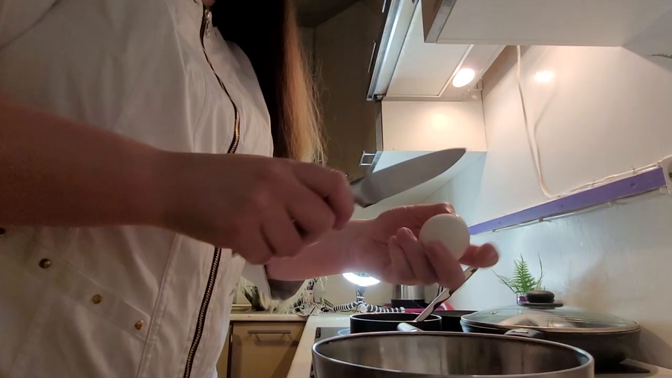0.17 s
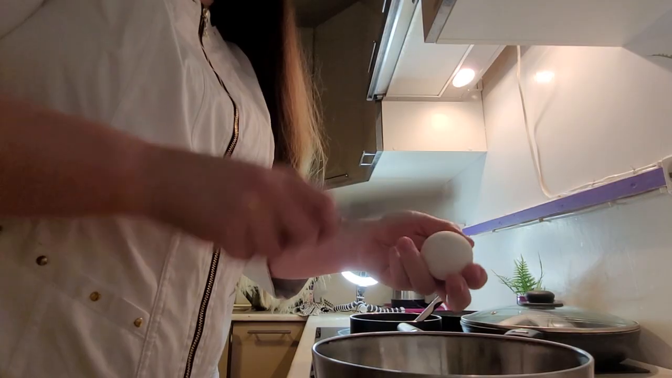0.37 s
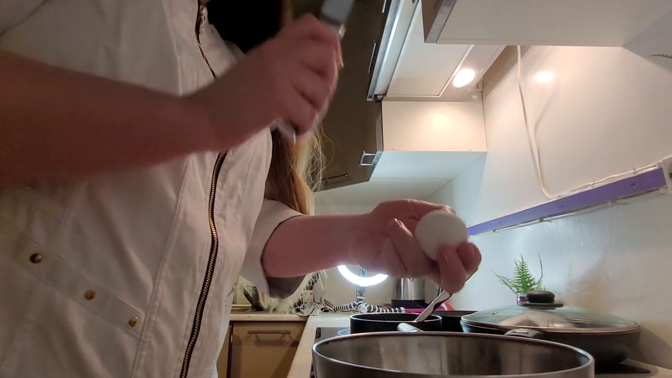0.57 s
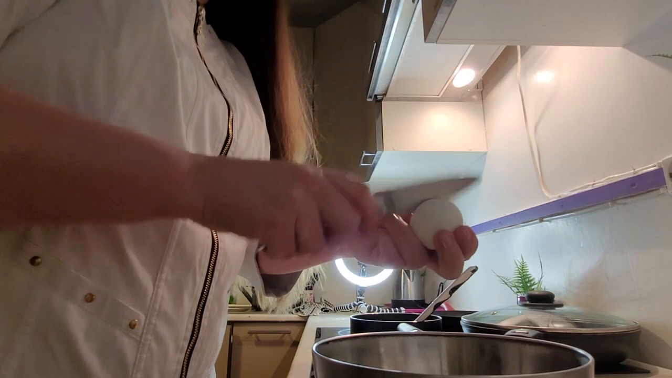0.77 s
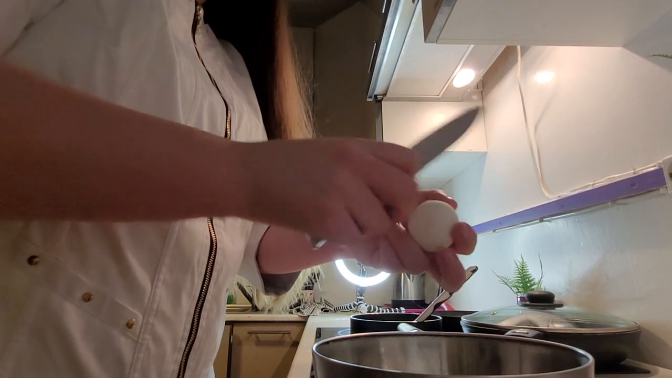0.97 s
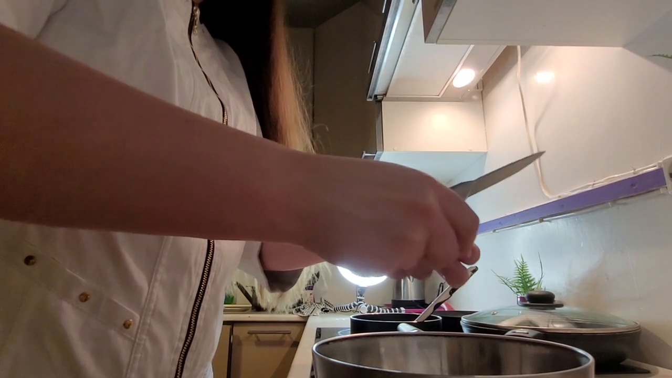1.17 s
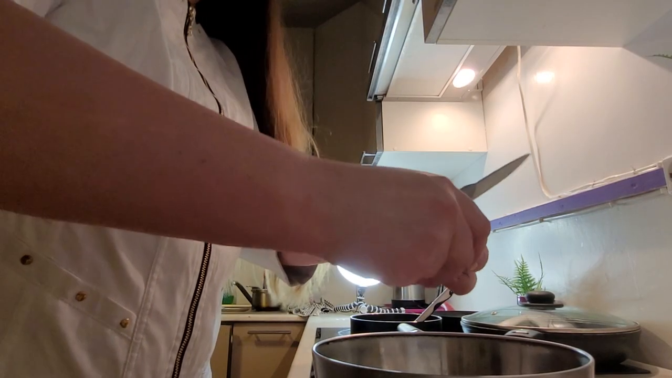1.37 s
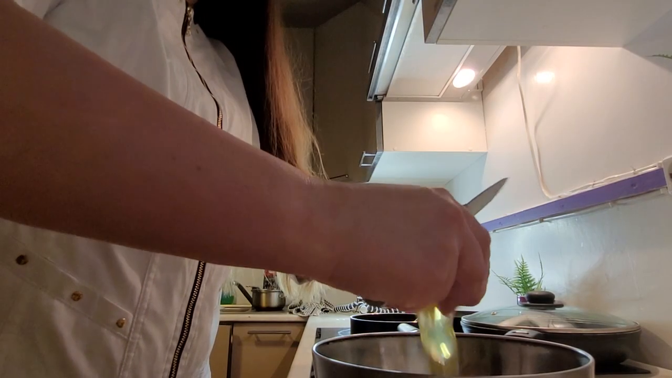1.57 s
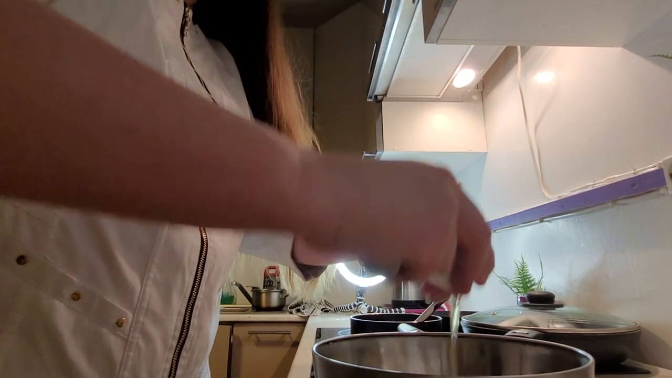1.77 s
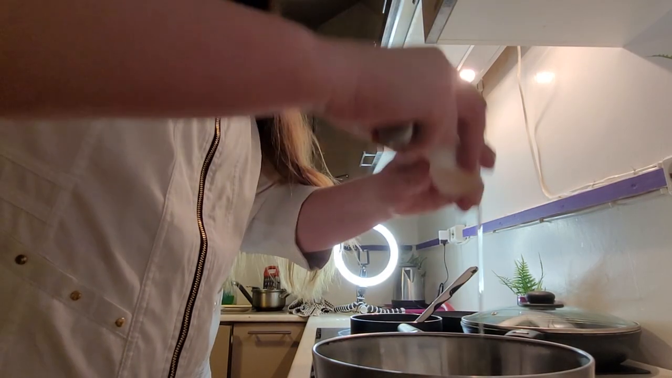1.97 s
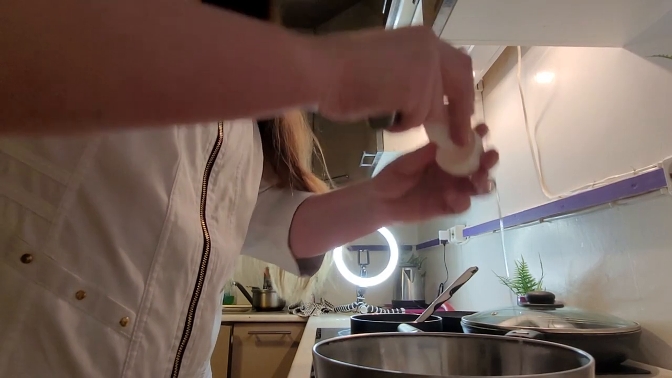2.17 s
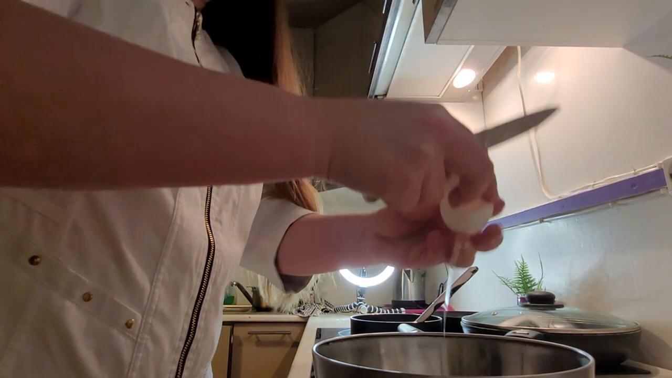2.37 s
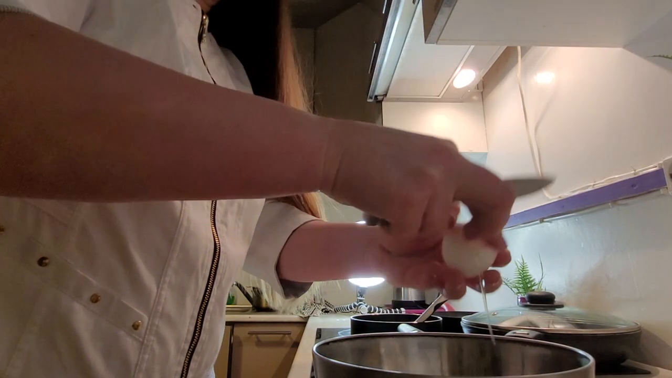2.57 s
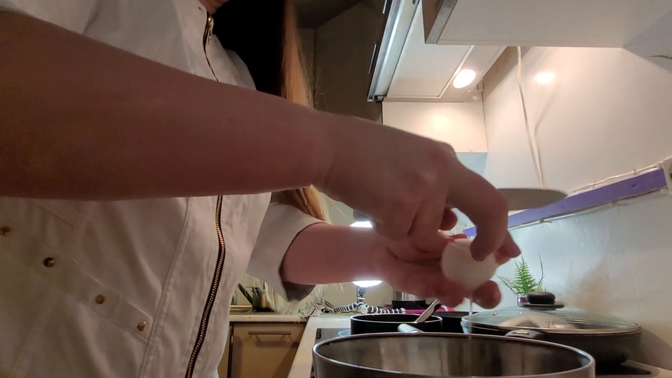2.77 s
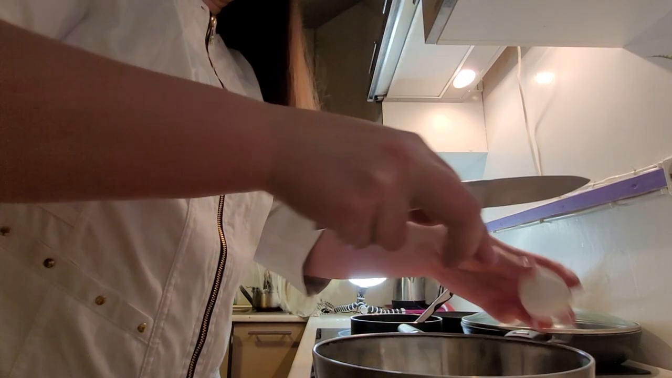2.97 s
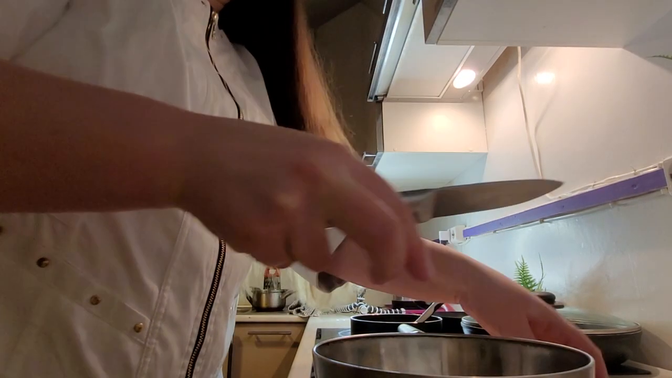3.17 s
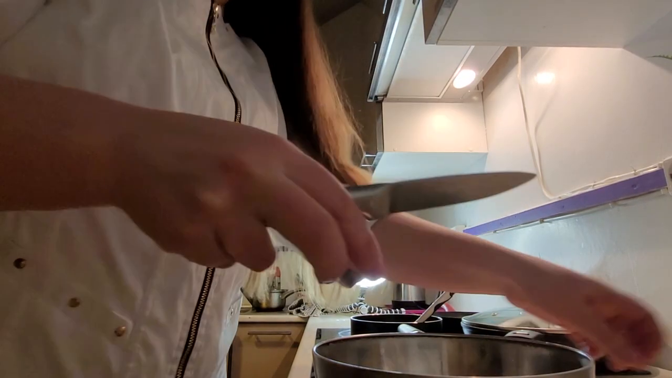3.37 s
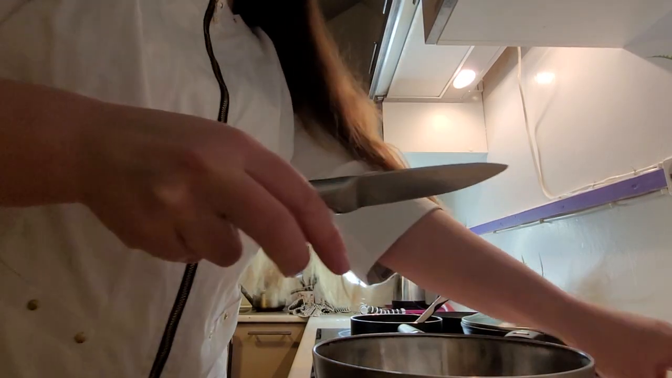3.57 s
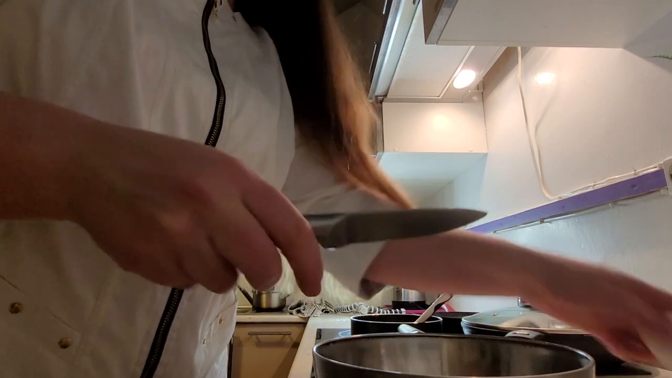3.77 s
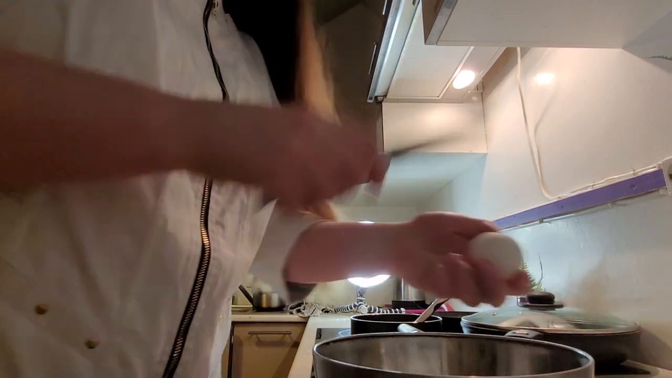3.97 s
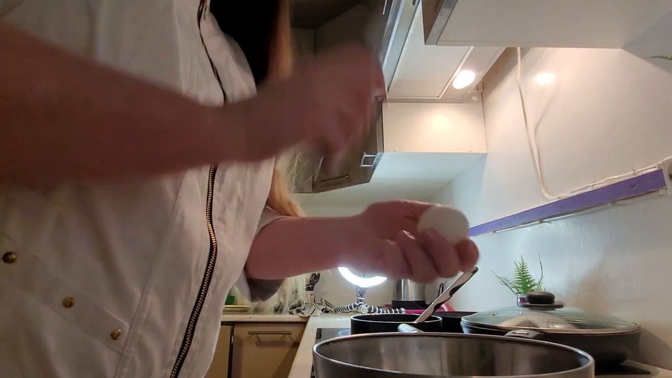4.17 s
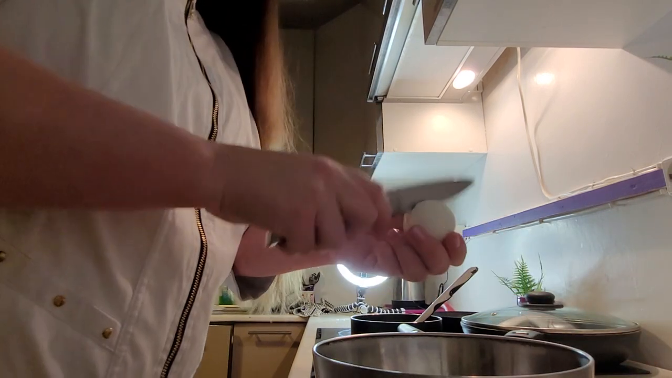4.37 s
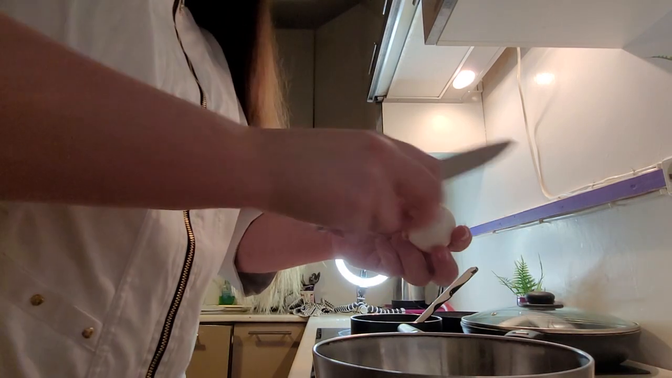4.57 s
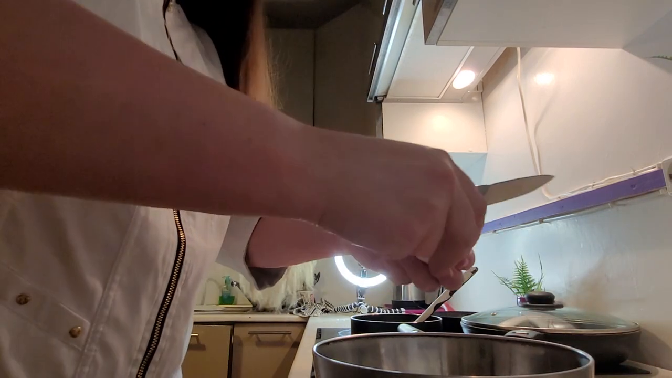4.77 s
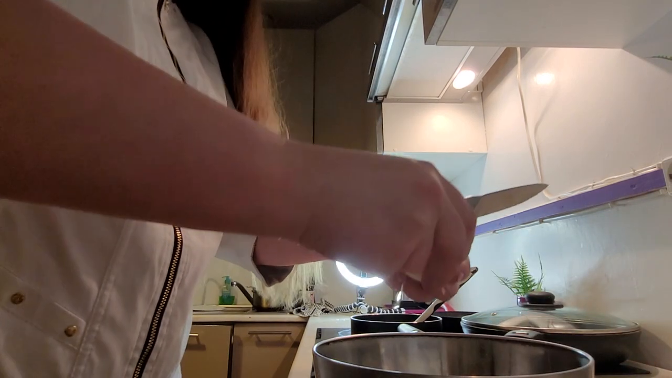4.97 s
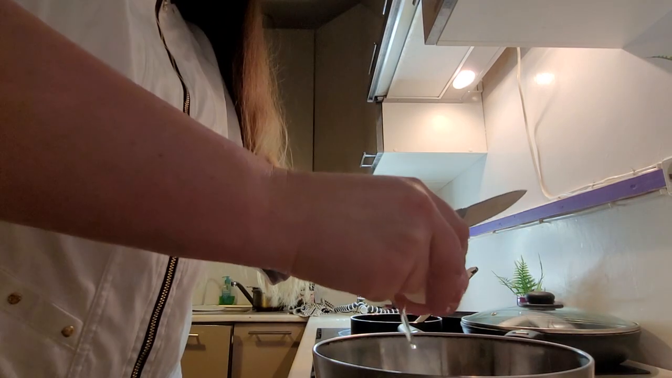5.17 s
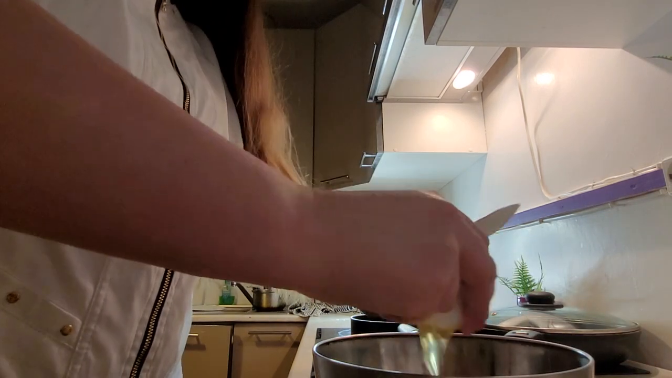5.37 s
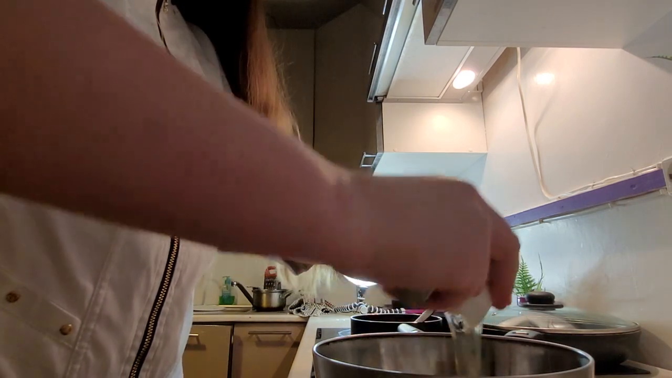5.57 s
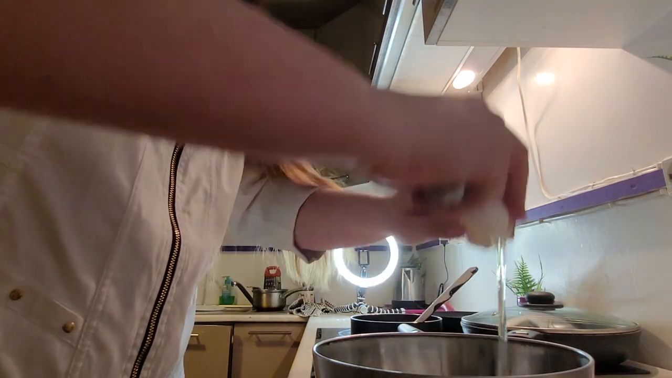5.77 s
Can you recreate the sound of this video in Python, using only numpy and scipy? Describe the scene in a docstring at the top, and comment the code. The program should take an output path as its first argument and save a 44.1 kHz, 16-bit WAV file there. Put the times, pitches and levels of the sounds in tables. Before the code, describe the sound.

Close stereo microphone, quiet home kitchen with low hum, hiss and faint sleeve rustle. A hard knife blow breaks an egg; small hollow crackles, a wet splat, and more shell ticks follow. A shell drops on the worktop, an egg is fetched with dull low bumps, then a second blow with brighter blade ring, a scrape and strong crunchy shell breaks.

```python
"""A small kitchen: two eggs are chopped with a knife and pulled open over a steel bowl, close to the
microphone. Shells are noise bursts of tiny breaks, ringing in the shell wall and in the egg's hollow; blade and
bowl are decaying modes. The first egg slaps into the bowl, its shell drops on the counter, the next egg rolls
as it is fetched. The chops overload the microphone; hum sines, filtered rumble, hiss, an early flickering noise
and sleeve noise lie behind."""
import sys
import numpy as np
from scipy import signal
from scipy.fft import rfft, irfft, next_fast_len
from scipy.io import wavfile
from scipy.ndimage import map_coordinates

SR = 44100
rng = np.random.default_rng(int(sys.argv[2]) if len(sys.argv) > 2 else 0)


def log_audio(samples):
    """Write samples as a 16-bit WAV file to the path given in sys.argv[1]."""
    # one column per channel
    frames = np.atleast_2d(samples).T
    # limit to full scale, then quantise
    limited = np.clip(frames, -1, 1)
    pcm = np.round(limited * 32767).astype(np.int16)
    wavfile.write(sys.argv[1], SR, pcm)


N = 256662
TIME_S = np.arange(N) / SR
AGE_S = np.arange(SR // 2) / SR  # time since the onset of a short sound

# mains hum and its neighbours: f/Hz, level/dB
HUM = [(100, -62), (167, -77.5), (200, -84.5), (290, -74.5)]
# low rumble, spectrum: f/Hz, density/dB per Hz
RUMBLE_SPECTRUM = [(22, -47.5), (38, -16.5), (54, 2.0), (75, -13.0), (130, -15), (400, -34.5), (2000, -86.5)]
# handling bumps at the worktop: t/s, level/dB
BUMPS = [(.21, -45), (.4, -58), (0.739, -45.5), (1.43, -50), (1.79, -38.5), (2.93, -51), (3.33, -39),
         (3.692, -34.5), (4.9, -46.5)]
# room hiss, spectrum: f/Hz, density/dB per Hz
HISS_SPECTRUM = [(30, 8.5), (60, 24.5), (150, 18.5), (260, 22.5), (420, 14.5), (560, 10.5), (750, 1.5),
                 (1100, 0), (2500, -5.5), (3800, -2.5), (5200, -3), (7500, 5), (10000, 3), (15500, 1)]
# early flickering noise, spectrum: f/Hz, density/dB per Hz
FLICKER_SPECTRUM = [(180, -32), (300, -6), (490, -6.5), (814, -6), (1190, -14.5), (1420, -11), (1970, -15.5),
                    (4050, -15.5), (12500, -24.5), (15000, -31.5)]
# early flickering noise, course: t/s, level/dB
FLICKER_LEVELS = [(0, -50.5), (.23, -50.5), (.26, -57), (.4, -73.5)]
# sleeve cloth, spectrum: f/Hz, density/dB per Hz
CLOTH_SPECTRUM = [(60, -6), (200, 7), (500, 8.5), (1000, -4.5), (1600, 1), (2600, -4), (7500, -5),
                  (10000, -9.5), (15500, -14)]
# arm movements brushing a sleeve: t at the fastest/s, level/dB, half length/s
STROKES = [(1.031, -56.5, .16), (1.502, -63.5, 0.51), (2.54, -57, 0.14), (3.154, -61, 0.17),
           (3.54, -53.5, 0.13), (3.935, -57.5, 0.12), (4.65, -60, 0.14), (5.65, -67.5, 0.22)]
# room decay: f/Hz, t60/s
ROOM_T60 = [(100, 0.63), (500, 0.32), (2000, 0.29), (4000, .29), (8000, .24), (15000, 0.077)]
# counter contacts: t/s, rise/s, decay/s, ring f/Hz, ring/dB, thud/dB, clack/dB, room/dB, left over right/dB
COUNTER = [(3.2661, 0.00043, 0.0018, 1583, -2.5, -19.5, -13.5, -10.5, -4.5),
           (3.280, 0.0032, 0.024, 1810, -35, -17.5, -18.5, -13, -2),
           (3.628, 0.0031, .012, 403, -33, -40.5, -46, -9.5, -7),
           (3.644, 0.011, 0.0063, 371, -25, -34, -42, -9, -6),
           (3.671, 0.0079, 0.0029, 378, -27, -37, -43.5, -25.5, -4)]
# counter thud, spectrum: f/Hz, density/dB per Hz
THUD_SPECTRUM = [(30, -25.5), (70, -20), (120, -2), (190, -1.5), (250, -10.5), (470, 3.5), (640, -1.5),
                 (780, -12), (980, 2.5), (1500, -13.5), (4000, -58)]
# counter clack, spectrum: f/Hz, density/dB per Hz
CLACK_SPECTRUM = [(300, -21.5), (1150, -1.5), (1550, 9), (2300, 7), (3200, -3), (4300, -11.5), (5200, -30),
                  (7200, -18), (10000, -24.5), (15500, -34)]
# raw egg landing: t/s, rise/s, decay/s, splat/dB, thud/dB, air pocket/dB
PLOPS = [(1.7646, 0.002, 0.0065, -34, -61, -55), (1.769, 0.00038, 0.016, -17.5, -33.5, -55),
         (1.808, 0.0027, 0.0038, -36, -37, -31.5)]
# bursting wet films, spectrum: f/Hz, density/dB per Hz
SPLAT_SPECTRUM = [(200, -3), (600, -20), (870, 1.5), (1050, -7.5), (1400, 1.5), (2200, -5), (4000, -14),
                  (5500, -13.5), (8000, 4.5), (10000, 0.5), (15500, 1.5)]
# soft landing thud, spectrum: f/Hz, density/dB per Hz
WET_THUD_SPECTRUM = [(30, -21), (60, -3.5), (100, 0), (200, -14.5), (450, -20.5), (1500, -58)]
# modes of the air pocket under the egg: f/Hz, level/dB, t60/s
POCKET_MODES = [(1430, -11, 0.13), (1530, -17, .12)]
# hollow of each egg, high while the split is narrow, lower as it opens and empties: t/s, f/Hz, Q/1
FIRST_HOLLOW = [(1.21, 2100, 4.3), (1.35, 3600, 1.55), (1.48, 3120, 15), (1.57, 2085, 10.4),
                (1.97, 1970, 3), (2.092, 2920, 0.54), (2.391, 1865, 4.9), (2.559, 1830, 9.1),
                (2.68, 1393, 12), (3.17, 1460, 7.9)]
SECOND_HOLLOW = [(4.45, 2200, 2.3), (4.74, 5600, 11), (4.9, 6000, 3.9), (5.11, 3086, 5.2), (5.16, 1945, 10),
                 (5.28, 1900, 2.5), (5.36, 2376, 0.85), (5.42, 1800, 1.9), (5.57, 1720, 6.4)]
# sudden shell breaks: t/s, level/dB, decay/s, dry snap over hollow ring/dB
CRACKS = [(0.827, -33, 0.002, 30), (1.213, -56, 0.0095, -8), (1.356, -42, .005, 8),
          (1.462, -20.5, 0.0029, 1), (1.48, -32, 0.0045, -1), (1.607, -35, .005, -7),
          (1.642, -50.5, 0.0039, 10), (1.893, -51, 0.0062, 8), (1.965, -47, 0.0071, -1.5),
          (2.022, -41.5, 0.00093, 1), (2.408, -31.5, 0.013, -7.5), (2.553, -36, 0.01, -5.5),
          (2.624, -43.5, 0.0074, -4.5), (2.66, -41, 0.013, -9), (2.683, -36.5, 0.0037, -9.5),
          (2.75, -48, .0047, -10.5), (3.1559, -36, 0.0014, -23), (3.1918, -42, 0.00046, -27),
          (4.547, -50, 0.0042, 19), (4.747, -45, 0.0067, -22.5), (4.895, -57.5, 0.0061, 2.5),
          (5.116, -47.5, 0.0054, 1.5), (5.152, -45.5, 0.0088, 3.5), (5.272, -28.5, 0.012, 2),
          (5.296, -24, 0.0089, 2.5), (5.3085, -11, 0.0099, -2), (5.419, -26.5, 0.0068, -13),
          (5.524, -22, 0.0049, 13), (5.57, -19.5, 0.0065, -3)]
# slow swelling sounds (shell and membrane tearing, white draining through the hollow, blade scraping out):
# t/s, level/dB, swelling time/s, dry snap over hollow ring/dB
SWELLINGS = [(1.555, -33, 0.0081, -24), (1.584, -35.5, 0.0072, -22), (2.058, -34.5, 0.038, -6),
             (2.378, -39, 0.027, 1), (2.459, -43.5, 0.055, -9), (2.78, -64, 0.11, -10),
             (3.02, -47.5, .1, -10.5), (4.385, -27, 0.036, 6.5), (5.075, -59, 0.057, -5),
             (5.347, -14, 0.0072, 0), (5.378, -26, .0047, -40), (5.548, -20.5, 0.014, -12.5)]
# dull knocks and rubs on the egg (blade knocking off the shell at 0.822 s, then fingers shifting their grip):
# t/s, level/dB, swelling time/s, f/Hz
DULL_RUBS = [(0.822, -35.5, 0.0027, 517), (1.376, -49.5, 0.0071, 654), (1.435, -42.5, 0.047, 637),
             (1.555, -44, 0.042, 700), (2.682, -39, 0.0012, 500), (4.58, -45.5, 0.0935, 432.6),
             (5.11, -53, 0.046, 670)]
# dry shell snap, spectrum: f/Hz, density/dB per Hz
SNAP_SPECTRUM = [(200, -39), (900, -25), (2000, -10.5), (4000, 8), (5600, 2), (7300, 6), (9500, -6.5),
                 (12000, -1), (15500, -7)]
# dull knock on the fingers, spectrum: f/Hz, density/dB per Hz
KNOCK_SPECTRUM = [(60, -19.5), (250, -20.5), (480, -5.5), (670, 0), (850, -27), (1200, -18), (4000, -29.5)]
# knife blows: t/s, level/dB, crushing time/s, decay/s, bowl ring/dB, room/dB
CHOPS = [(0.7275, -0.5, 0.0043, 0.0042, -26.5, -6.5), (4.285, -0.5, 0.0052, 0.00726, -28, -5.5)]
# spectrum of each blow on its egg, one list per blow: f/Hz, density/dB per Hz
CHOP_SPECTRA = [
    [(47, -52.5), (80, -24), (190, -18.5), (391, -6.5), (477, -10), (621, -0.5), (741, -9.5), (1150, -12),
     (1570, -8.5), (1870, -10), (2600, -6), (2970, -10), (3780, -1.5), (5620, -10.5), (6860, -7.5),
     (15500, -12.5)],
    [(47, -54.5), (80, -26), (220, -21.5), (400, -2.5), (741, -7), (864, -5.5), (1010, -10), (1080, -4),
     (1950, -16.5), (2180, -4.5), (3240, -14), (3700, -5), (7170, -6.5), (8740, -11), (15500, -9.5)],
]
# blade set ringing, as it strikes or springs free of the shell: t/s, ring/dB, rub/dB
TWANGS = [(.728, -32, -30), (4.2875, -22, -30), (4.4515, -33, -30)]
# steel modes of blade and bowl: f/Hz, level/dB, t60/s
BLADE_MODES = [(1599, -18, .33), (2234, 1, .2), (3900, -12, .37), (5900, -7, .17), (6379, -14, .14),
               (7887, -10, .15), (8511, -13, .12), (11550, -9, .09), (12300, -10, .12)]
BOWL_MODES = [(392, -10.5, .25), (620, -3.5, 0.3), (855, -8, 0.31), (1280, -10, .22), (1520, -3, 0.15),
              (1785, -9, 0.24), (2611, -5.5, .26), (2799, -8.5, .25), (3680, -4, 0.25), (3900, 4, 0.18),
              (4274, -5.5, .27), (4470, -3, .25), (4780, -7.5, .25), (6616, -0.5, .22), (7047, -2.5, 0.2),
              (7106, -4.5, 0.18), (8023, -10.5, .25)]

RUMBLE_DB, RUMBLE_SWING_DB, BUMP_HALF_S = -59.5, -1, 0.018
CLOTH_REST_DB = -72  # clothes between the movements
CRACK_RISE_SHARE, SWELLING_DECAY_S = 0.14, 0.013  # a crack's rise over its decay; a swelling's decay
WALL_HZ, WALL_Q, WALL_DB = 3443, 12, -5.5  # the shell wall's own ring, against the hollow
WALL_DB_PER_OCTAVE = -9.5  # between hollow and wall: the closer, the better they couple
KNOCK_DB, KNOCK_DB_PER_DB = -22.5, 0.85  # knock of a 0 dB break; its growth with the break
HAND_Q, RUB_DECAY_S = 3.2, 0.0036  # cupped hand around the egg; decay of a dull rub
BAND_LIMIT_HZ = 15800


def amp(db):
    """Decibels to gain."""
    return 10 ** (np.asarray(db) / 20)


def unit(x):
    """Scale to rms 1."""
    return x / np.sqrt(np.mean(x ** 2) + 1e-20)


def dose(x):
    """Scale each port of a short sound to the energy of 10 ms at rms 1."""
    energy = np.sum(x ** 2, axis=-1, keepdims=True)
    return x / np.sqrt(energy / (SR / 100) + 1e-20)


def along(points, hz):
    """Read (f/Hz, value) points on a log frequency axis."""
    f, value = np.transpose(points)
    return np.interp(np.log(hz + 1), np.log(f), value)


def swell(rows):
    """Gain per sample from (t/s, level/dB) rows."""
    return amp(np.interp(TIME_S, *np.transpose(rows)))


def bell(s, half_s):
    """Smooth rise and fall around time s."""
    return np.exp(-((TIME_S - s) / half_s) ** 2)


def wobble(rate_hz):
    """Smooth random curve, rate_hz knots a second."""
    knots = rng.standard_normal(int(N * rate_hz / SR) + 4)
    return map_coordinates(knots, [TIME_S * rate_hz])


def filtered(x, response):
    """Apply a complex frequency response, with zero padding."""
    n = x.shape[-1]
    m = 2 * next_fast_len(n // 2 + 4096)
    return irfft(rfft(x, m) * response(np.fft.rfftfreq(m, 1 / SR)), m)[..., :n]


def coloured(x, spectrum):
    """Minimum-phase filter of the given shape, by folding the cepstrum."""
    def response(hz):
        cepstrum = irfft(np.log(amp(along(spectrum, hz))))
        half = len(cepstrum) // 2
        cepstrum[1:half] *= 2
        cepstrum[half + 1:] = 0
        return np.exp(rfft(cepstrum))
    return filtered(x, response)


def resonance(hz, centre_hz, q):
    """Response of one damped resonance, 1 at its centre."""
    damping = 1j * hz * centre_hz / q
    return damping / (centre_hz ** 2 - hz ** 2 + damping)


def resonated(x, first, second):
    """Two resonances in series, each (f/Hz, Q)."""
    return filtered(x, lambda hz: resonance(hz, *first) * resonance(hz, *second))


def add(track, s, x):
    """Mix x into track from time s."""
    i = round(s * SR)
    track[:, i:i + x.shape[-1]] += x[..., :N - i]


def rush(spectrum, apart):
    """Steady stereo noise of rms 1; apart weighs each port's own noise against the shared one."""
    noise = rng.standard_normal(N) + apart * rng.standard_normal((2, N))
    return unit(coloured(noise, spectrum))


def fractures(rise_s, decay_s, hold_s=0, spiky_db=5, apart=1.0):
    """A run of tiny breaks of very unequal size; each port hears them a little differently."""
    n = len(AGE_S)
    fade = np.exp(-np.maximum(AGE_S - rise_s - hold_s, 0) / decay_s)
    shape = np.minimum(AGE_S / rise_s, 1) * fade
    sizes = amp(spiky_db * np.clip(rng.standard_normal(n), -2, 2))
    sizes = sizes[np.arange(n) // (SR // 2000)]  # a new size every half millisecond
    return shape * sizes * (rng.standard_normal(n) + apart * rng.standard_normal((2, n)))


def ring(modes):
    """Decaying modes, each at its own strength and phase in either port."""
    hz, db, t60_s = np.transpose(modes)[:, :, None]
    tilt_db = np.array([1, -1])[:, None, None] * rng.normal(0, 1.2, hz.shape)
    size = amp(db + tilt_db)
    phase = rng.uniform(0, 2 * np.pi, hz.shape) + rng.normal(0, 0.17, size.shape)
    fade = np.exp(-np.log(1000) * AGE_S / t60_s) * (1 - np.exp(-AGE_S / 0.0013))
    return np.sum(size * fade * np.sin(2 * np.pi * hz * AGE_S + phase), axis=1)


def kitchen(x, wet_db, near_db=-7):
    """Bowl, hands and counter answer within milliseconds, then the tiled walls."""
    hz, t, z = signal.stft(rng.standard_normal((2, len(AGE_S))), SR, nperseg=256)
    fade = np.exp(-np.log(1000) * t / along(ROOM_T60, hz)[:, None])
    tail = signal.istft(z * fade, SR, nperseg=256)[1][:, :len(AGE_S)]
    tail *= 1 - np.exp(-(AGE_S / 0.002) ** 2)
    near = rng.standard_normal(tail.shape) * np.exp(-AGE_S / 0.0038)
    near *= rng.random(tail.shape) < 0.1  # sparse reflections
    answer = 0
    for h, db in [(tail, wet_db), (near, near_db)]:
        answer = answer + amp(db) * h / np.linalg.norm(h, axis=1, keepdims=True)
    return x + signal.fftconvolve(x, answer, axes=1)[:, :x.shape[-1]]


def placed(x, left_db, lag_s, mono_hz=450):
    """Long waves reach both ports more alike; the left is louder by left_db and later by lag_s."""
    side = filtered((x[0] - x[1]) / 2, lambda hz: (hz + 0.28 * mono_hz) / (hz + mono_hz))
    pair = x.mean(axis=0) + np.array([side, -side])
    lags_s = np.array([[lag_s], [-lag_s]])  # half of it to each port
    shifted = filtered(pair, lambda hz: np.exp(-1j * np.pi * hz * lags_s))
    return amp([[left_db / 2], [-left_db / 2]]) * shifted


def mains_hum():
    """Steady sines, wandering a little in level and phase."""
    hum = 0
    for hz, db in HUM:
        gain = amp(db + wobble(2.9)) * np.sqrt(2)  # rms to peak
        hum = hum + gain * np.sin(2 * np.pi * hz * TIME_S + 0.2 * wobble(1))
    return hum


def rumble():
    """Low noise that wanders, and swells at each bump."""
    gain = amp(RUMBLE_DB + RUMBLE_SWING_DB * wobble(4.2))
    gain = gain + sum(amp(db) * bell(s, BUMP_HALF_S) for s, db in BUMPS)
    return gain * rush(RUMBLE_SPECTRUM, apart=0.27)


def early_flicker():
    """Flickering noise, strong in the first quarter second, then dropping to a faint level."""
    return swell(FLICKER_LEVELS) * amp(1.3 * wobble(120)) * rush(FLICKER_SPECTRUM, apart=1.6)


def sleeves():
    """Cloth rustles with the speed of the arm, which rises and falls in each movement."""
    gain = amp(CLOTH_REST_DB) + sum(amp(db) * bell(s, half_s) for s, db, half_s in STROKES)
    return gain * amp(0.43 * wobble(19)) * rush(CLOTH_SPECTRUM, apart=6.3)


def background():
    """Hum and rumble, then hiss, early flicker and sleeves with a smaller lag."""
    low = mains_hum() + rumble()
    hiss = amp(-65.5) * rush(HISS_SPECTRUM, apart=2.4)
    high = hiss + early_flicker() + sleeves()
    return placed(low, left_db=-1.0, lag_s=0.0002) + placed(high, left_db=-1.0, lag_s=0.00005)


def counter():
    """An empty shell drops with a hollow pock and settles; a full egg wobbles along, much lower."""
    out = np.zeros((2, N))
    for s, rise_s, decay_s, ring_hz, ring_db, thud_db, clack_db, wet_db, left_db in COUNTER:
        contact = fractures(rise_s, decay_s, spiky_db=1.0, apart=0.29)
        pock = dose(resonated(contact, (ring_hz, 5), (ring_hz, 1.2)))
        thud = dose(coloured(fractures(rise_s, decay_s + 0.01, apart=0.48), THUD_SPECTRUM))
        clack = dose(coloured(contact, CLACK_SPECTRUM))
        knock = amp(ring_db) * pock + amp(thud_db) * thud + amp(clack_db) * clack
        add(out, s, placed(kitchen(knock, wet_db), left_db, lag_s=0.00027))
    return out


def plops():
    """The egg slaps onto steel: a spray of bursting films, a soft thud and the pop of trapped air."""
    out = np.zeros((2, N))
    for s, rise_s, decay_s, splat_db, thud_db, pocket_db in PLOPS:
        slap = fractures(rise_s, decay_s, spiky_db=-4.0, apart=1.46)
        splat = amp(splat_db) * dose(coloured(slap, SPLAT_SPECTRUM))
        thud = amp(thud_db) * dose(coloured(fractures(rise_s, decay_s, apart=0.42), WET_THUD_SPECTRUM))
        pop = amp(pocket_db) * dose(resonated(slap, (1460, 44), (1900, 1.9)))
        landing = kitchen(splat + thud, wet_db=-11.0) + kitchen(pop, wet_db=-8.5)
        landing = landing + amp(pocket_db) * ring(POCKET_MODES)
        add(out, s, placed(landing, left_db=-2, lag_s=0.00009))
    return out


def dull_rub(db, rise_s, pitch_hz):
    """A knock or rub on the shell sounds dully in the cupped hand."""
    rub = fractures(rise_s, RUB_DECAY_S, apart=0.74)
    return amp(db) * dose(resonated(rub, (pitch_hz, HAND_Q), (pitch_hz, 2.5)))


def shell_burst(s, db, rise_s, decay_s, snap_db):
    """A grainy burst snaps, rings the shell wall and the hollow as it is just then, and knocks dully."""
    times_s, pitches_hz, qs = np.transpose(FIRST_HOLLOW + SECOND_HOLLOW)
    hollow_hz, q = np.interp(s, times_s, pitches_hz), np.interp(s, times_s, qs)
    grains = fractures(rise_s, decay_s, spiky_db=7.5, apart=0.97)
    hollow = dose(resonated(grains, (hollow_hz, q), (hollow_hz, 1.0)))
    wall = dose(resonated(grains, (WALL_HZ, WALL_Q), (WALL_HZ, 3.8)))
    wall_db = WALL_DB + WALL_DB_PER_OCTAVE * abs(np.log2(hollow_hz / WALL_HZ))
    snap = dose(coloured(grains, SNAP_SPECTRUM))
    burst = hollow + amp(wall_db) * wall + amp(snap_db) * snap
    knock = dose(coloured(grains, KNOCK_SPECTRUM))
    knock_db = KNOCK_DB + KNOCK_DB_PER_DB * db
    return amp(db) * burst / np.hypot(1, amp(snap_db)) + amp(knock_db) * knock


def shells():
    """The egg is opened: cracks start at once and die away, slower sounds swell and let go, rubs are dull."""
    sounds = []
    for s, db, decay_s, snap_db in CRACKS:
        sounds.append((s, shell_burst(s, db, CRACK_RISE_SHARE * decay_s, decay_s, snap_db)))
    for s, db, rise_s, snap_db in SWELLINGS:
        sounds.append((s, shell_burst(s, db, rise_s, SWELLING_DECAY_S, snap_db)))
    for s, db, rise_s, pitch_hz in DULL_RUBS:
        sounds.append((s, dull_rub(db, rise_s, pitch_hz)))
    out = np.zeros((2, N))
    for s, sound in sounds:
        add(out, s, placed(kitchen(sound, wet_db=-10, near_db=-2), left_db=-1.5, lag_s=0.00009))
    return out


def blade_twangs():
    """The edge slips on the shell while the steel rings freely."""
    out = np.zeros((2, N))
    for s, ring_db, rub_db in TWANGS:
        rub = dose(coloured(fractures(0.0022, 0.0024), SNAP_SPECTRUM))
        add(out, s, amp(ring_db) * ring(BLADE_MODES) + kitchen(amp(rub_db) * rub, wet_db=-15))
    return out


def chops():
    """The blade crushes into the egg for milliseconds and sets the bowl below ringing."""
    out = np.zeros((2, N))
    for (s, db, hold_s, decay_s, bowl_db, wet_db), spectrum in zip(CHOPS, CHOP_SPECTRA):
        breaks = fractures(0.0014, decay_s, hold_s, spiky_db=5.5, apart=1.2)
        crush = dose(coloured(breaks, spectrum))
        blow = kitchen(amp(db) * crush, wet_db) + amp(bowl_db) * ring(BOWL_MODES)
        add(out, s, placed(blow, left_db=-1.5, lag_s=0.00012))
    return out


def scene():
    """Everything at the two microphone ports."""
    return chops() + blade_twangs() + shells() + plops() + counter() + background()


def record(dry):
    """The loudest blows clip; a steep low-pass follows."""
    clipped = np.clip(dry, -0.95, 0.95)
    return filtered(clipped, lambda hz: 1 / (1 + (hz / BAND_LIMIT_HZ) ** 200))


dry = scene()
out = record(dry)
log_audio(out)
```